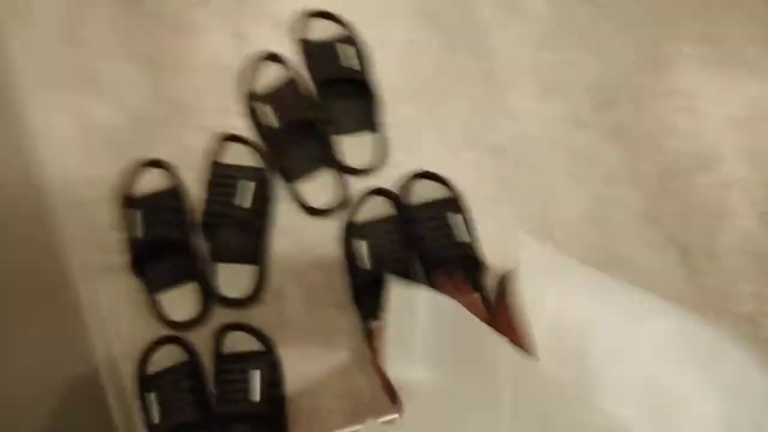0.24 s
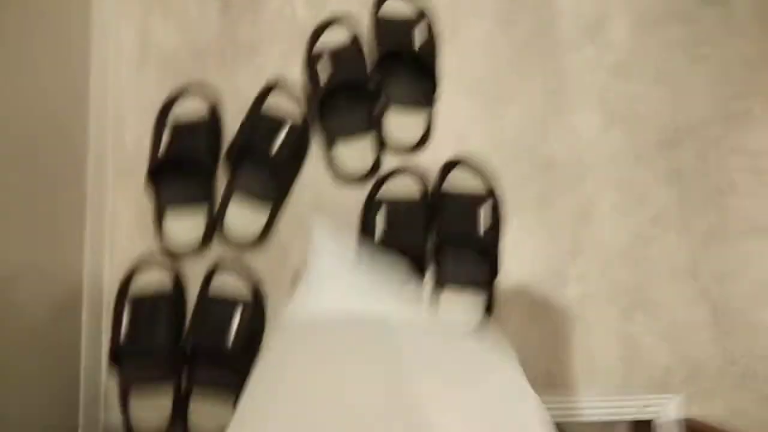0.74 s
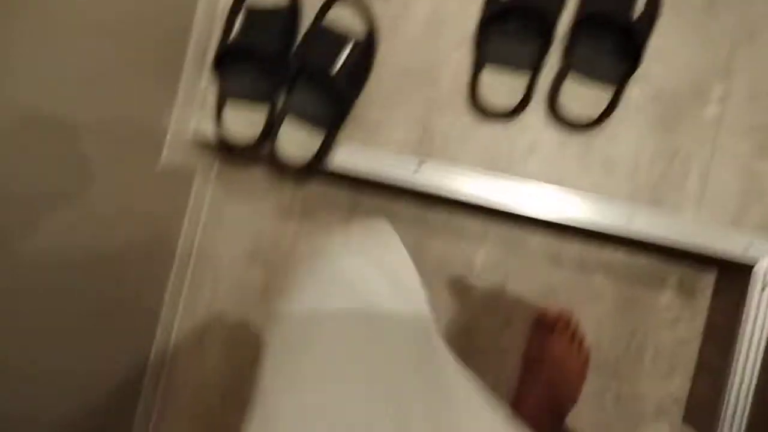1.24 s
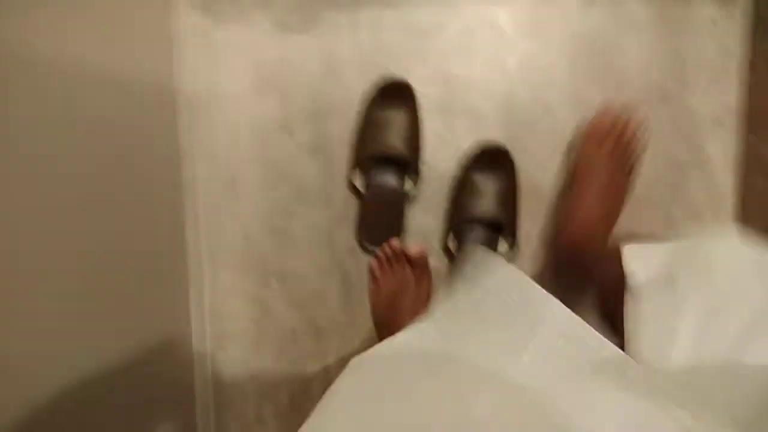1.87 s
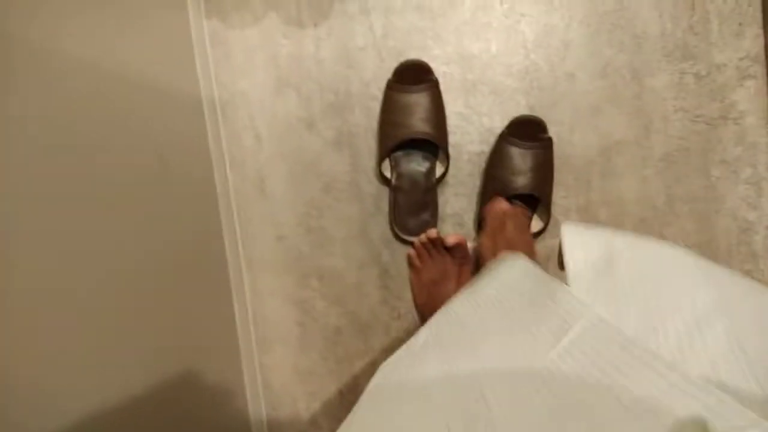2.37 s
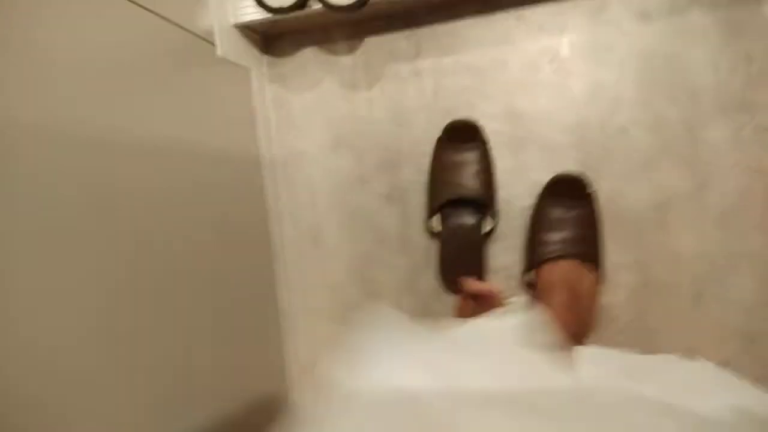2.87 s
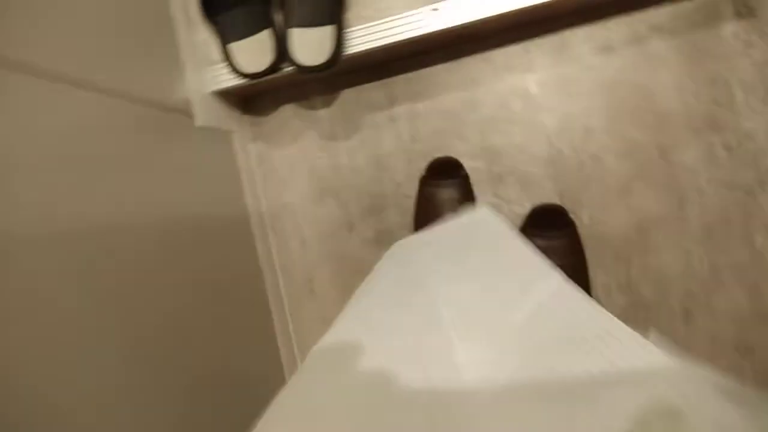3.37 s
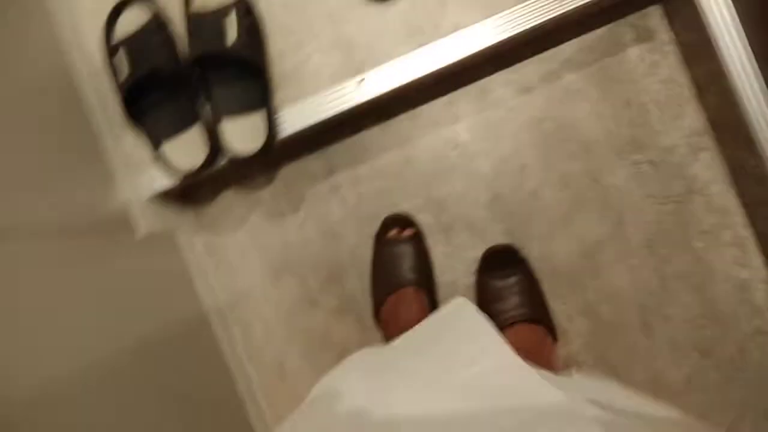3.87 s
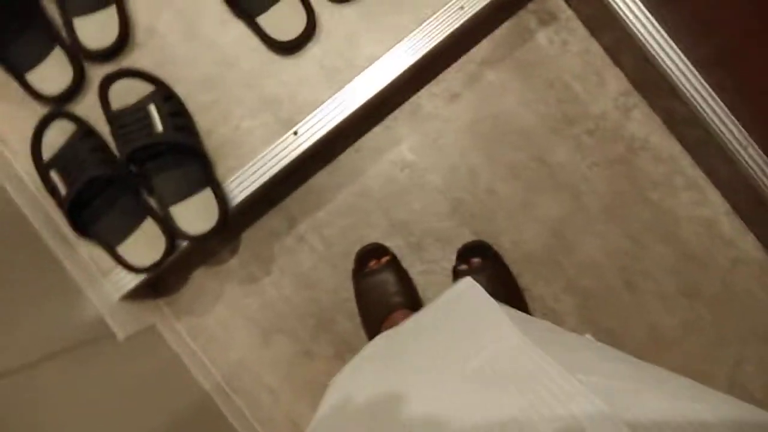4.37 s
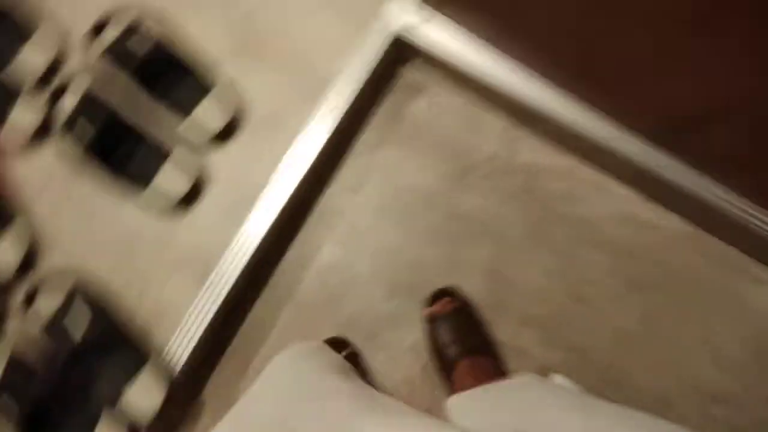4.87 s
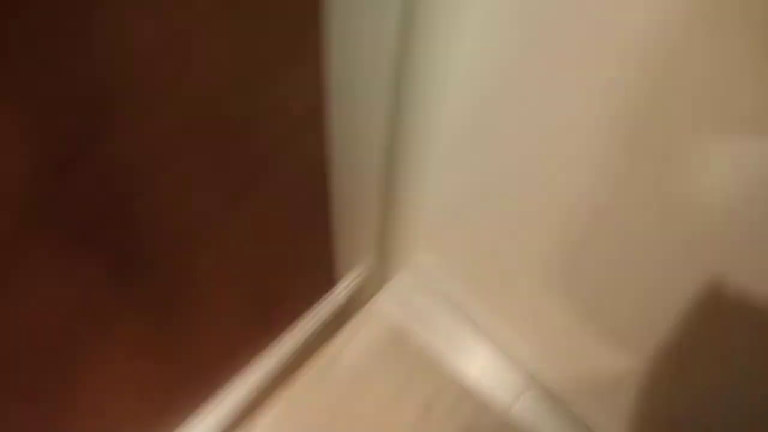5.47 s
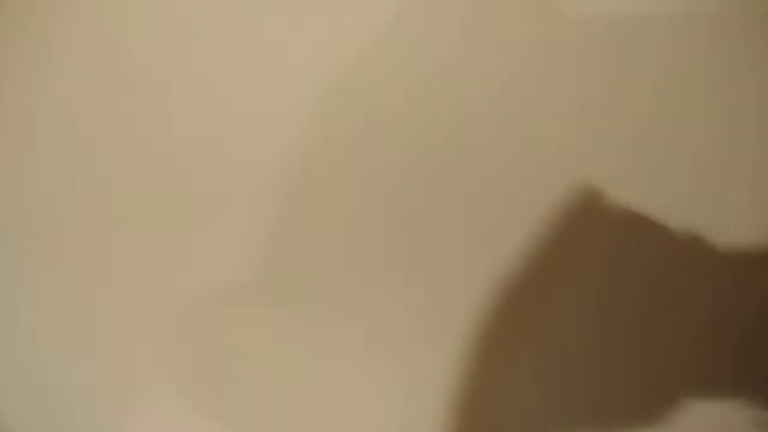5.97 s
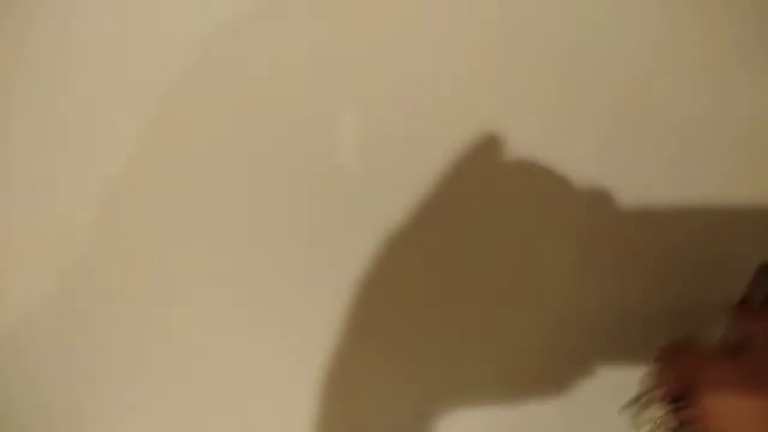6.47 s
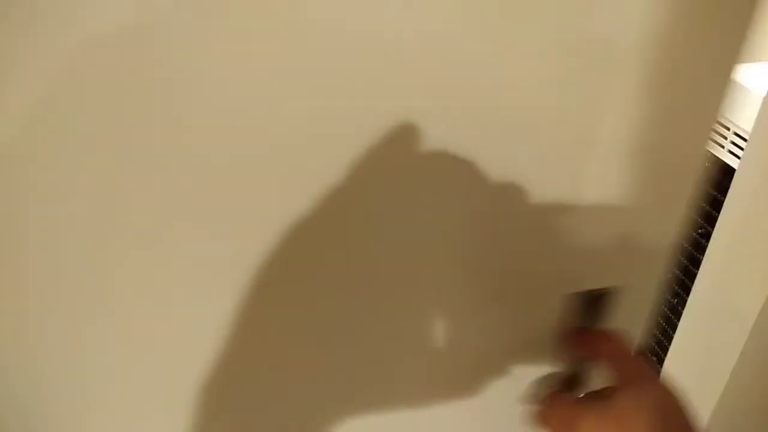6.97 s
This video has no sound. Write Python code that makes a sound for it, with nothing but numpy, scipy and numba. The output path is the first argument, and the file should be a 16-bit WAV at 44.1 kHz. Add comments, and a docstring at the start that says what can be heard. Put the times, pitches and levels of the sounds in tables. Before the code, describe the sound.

Bare feet and slippers scuff, slap and thud irregularly in a small hard-walled entrance hall, then a latch clicks and a door rumbles open.

```python
"""Footsteps and a sliding door in a small hall

Bare feet and slippers shuffle in a small hard-walled entrance hall, heard through a phone with two ports.
Soles scuff (coloured noise), rub (gliding resonances) and slap (short partials with a noisy crack);
heels thud and set the hall's damped modes booming. At the end a latch clicks and a door slides open,
its panel shaken by noise. The left port hears more treble, the right one more of the middle.
"""
import sys
import numpy as np
from scipy import signal
from scipy.fft import rfft, irfft, next_fast_len
from scipy.io import wavfile
from scipy.ndimage import uniform_filter1d
from numba import njit

SR = 44100
rng = np.random.default_rng(int(sys.argv[2]) if len(sys.argv) > 2 else 0)


def master(y):
    """Save y as 16-bit WAV."""
    cut = np.clip(np.atleast_2d(y).T, -1, 1)
    pcm = np.round(cut * 32767)  # scale
    wavfile.write(sys.argv[1], SR, pcm.astype(np.int16))


N = 318568

# Strokes of soles and hem over the floor and, near the end, of hand and door: (peak time [s],
# swell [s per 20 dB], fade [s per 20 dB], fine hiss [dB], dull hiss relative to fine [dB],
# coarse rasp [dB], rasp centre [Hz], weight on floor [dB]);
# each layer multiplies the swell and fade by its own linger, and a swell of 0 or less is abrupt
STROKES = [(0.02, 7.2, 0.3, -67, 1, -69, 1900, -94), (0.07, 0.002, 0.5, -54, 0, -64, 2120, -94),
           (0.096, 0.03, .16, -49, -4, -62, 850, -90), (0.266, 0.15, 0.22, -44.5, -7, -52.5, 970, -80),
           (0.442, -0.36, 0.22, -56, -5, -61.5, 1590, -45),
           (.605, 0.36, 0.7, -64.5, -8, -67.5, 1300, -61.5), (.78, 0.13, 0.64, -50.5, -7, -60.5, 1680, -49),
           (0.923, 0.1064, 0.1655, -38.5, -3.5, -46.5, 1770, -37),
           (.97, 0.1, 0.0563, -45, 2, -47, 1900, -55), (1.078, 0.27, 0.12, -54.5, 3, -51.5, 1090, -38),
           (1.28, 0.9, 0.62, -57, -2, -63, 2020, -89.5), (1.55, 0.05, 0.6, -60.5, -10, -66, 1150, -78),
           (1.661, 0.1, 0.22, -55.5, -0.5, -57.5, 1260, -60),
           (1.778, 0.03, 0.06, -41.5, -4, -52.5, 1800, -51), (1.852, 0.11, 0.17, -44, -3, -59, 1870, -43),
           (2.06, 2, 0.24, -68, -17, -64.5, 780, -73), (2.23, 0, 1.3, -80, -3, -65, 990, -80),
           (2.265, 0.06, 0.5, -64, -5, -70, 1100, -80), (2.284, 0, 0.02, -60, -5, -59, 1290, -62),
           (2.39, 0.08, 0.22, -59.5, -2, -57, 1290, -61), (2.438, 0.3, 0.17, -50.5, -11, -59.5, 1390, -57),
           (2.588, -0.18, 0.34, -57, 0, -56.5, 1590, -56), (2.669, 0.27, 0.35, -50.5, -5.5, -62, 1200, -51),
           (2.77, 0, 0.11, -56.5, 7, -53.5, 1210, -71), (2.861, -0.06, 0.39, -51.5, -1.5, -60, 1200, -57),
           (2.958, -0.09, 0.21, -52.5, 0.5, -60.5, 2210, -53),
           (3.07, -0.1, 0.36, -65.5, 2.5, -76, 1510, -57), (3.201, -0.07, 0.2, -70, 0, -64, 1000, -81),
           (3.247, 0.2, 0.1, -63.5, 0, -67, 1200, -71.5), (3.355, 0.08, 0.1, -67, 3, -66.5, 1800, -86),
           (3.401, 0.08, 0.2, -53.5, -4, -62, 1410, -86), (3.54, 0.13, 0.2, -58.5, 0.5, -59, 1280, -87.5),
           (3.634, -0.19, 0.3, -54.5, 2.5, -59.5, 1510, -67),
           (3.666, -0.08, 0.28, -50, -18.5, -58.5, 1390, -51.5),
           (3.861, 0.01, 0.06, -59, -8.5, -54, 1320, -40.5),
           (3.901, -0.03, 0.16, -43.5, -1.5, -54, 1200, -47),
           (3.951, 0.13, 0.29, -44, -1, -50, 1240, -45.5),
           (4.185, 0.1, 0.48, -49.5, -9, -54.5, 1200, -58.5), (4.268, -0.06, 0.2, -52, -24, -65, 1180, -82),
           (4.331, -0.57, 0.4, -59.5, 1.5, -57.5, 950, -49), (4.436, -0.5, 0.48, -54.5, -4, -59, 1080, -52),
           (4.602, 0.06, 0.14, -39, -7, -51, 960, -51), (4.768, 0.02, 0.31, -48.5, -7, -58.5, 1280, -59),
           (4.892, 0.07, 0.17, -56.5, 4.5, -60, 970, -55), (5.118, -0.45, 0.11, -54.5, -0.5, -58, 950, -43),
           (5.29, 0.53, 0.08, -72, 8, -63.5, 1200, -55.5), (5.35, 0.03, 0.12, -47.5, -6, -59, 1160, -88),
           (5.402, 0.09, 0.23, -41.5, -22, -58.5, 2600, -85),
           (5.575, 0.008, 0.2, -47.5, -7, -56, 1290, -78), (5.65, 0, .5, -56, -3, -60.5, 1190, -78),
           (5.83, 0.75, 0.57, -57, -5, -59, 1500, -74), (5.909, 0.004, 0.1, -40, -5, -52.5, 1400, -46.5),
           (5.979, -0.12, 0.22, -63, 3, -58.5, 1600, -37.5),
           (6.013, 0.0051, 0.115, -43.5, -3.5, -50, 1500, -34),
           (6.2, 1.5, 0.15, -57, -2.5, -66, 1810, -57.5), (6.3, 0.01, 0.5, -60, -2.5, -64, 1500, -70),
           (6.37, 0.28, 0.4, -55, -3, -60, 1650, -51.5), (6.474, 0.13, 0.31, -58.5, 0, -59, 1500, -42.5),
           (6.64, 0.14, 0.26, -53.5, -2.5, -59.5, 1050, -48.5), (6.939, 0, 0.04, -59, 1, -55, 1000, -60),
           (6.95, 0.01, 0.9, -62, -3, -62, 1000, -70), (7.088, 0.02, 0.06, -51, -8, -55, 870, -56.5),
           (7.155, 0.3, 0.25, -52.5, -6, -52, 870, -60)]
HISS_LINGER, DULL_LINGER, RASP_LINGER, WEIGHT_LINGER = 0.83, 0.89, 1.3, 0.77
# Colour of the fine hiss: (frequency [Hz], level per Hz [dB])
HISS = [(3500, -22), (5500, -10.5), (6800, -5.5), (8000, -2.5), (11700, -5), (15200, -7.5), (16000, -14)]
# Colour of the dull hiss: (frequency [Hz], level per Hz [dB])
DULL_HISS = [(1500, -10), (2500, -4.5), (3500, 0), (5000, -1), (6500, -4.5), (9000, -13)]
# Colour of the coarse rasp: (frequency [Hz], level per Hz [dB])
RASP = [(400, -8), (650, -3), (800, -1.5), (1100, -5), (1800, -5), (3000, -7.5), (5000, -7), (8000, -68)]
# Parts of the hiss that come and go on their own: (centre [Hz])
PATCHES = [3000, 4840, 7700, 10100, 14100]
PATCH_DB = 2  # spread of each part's wandering level
# the fainter the fine hiss, the more it leans to the left port
LEAN_BELOW_DB, LEAN_DB_PER_DB, LEAN_MOST_DB = -44, 0.1, 22
TICKS_PER_S, TICK_DB, TICK_S = 260, -11, 0.00068  # rate, least strength, decay constant
CRACKS_PER_S, CRACK_DB = 100, 28.5  # rate, least strength before filtering

# Narrow rubs of a sole: (start [s], end [s], level [dB], first pitch [Hz], last pitch [Hz], sharpness [Q])
RUBS = [(0.07, 0.115, -57, 1800, 1870, 9), (0.093, 0.21, -63, 850, 880, 5),
        (1.52, 1.69, -61, 850, 650, 2.5), (2.226, 2.28, -63, 950, 1150, 2.5),
        (2.24, 2.28, -67, 2250, 2000, 5), (2.74, 2.8, -55, 1700, 2300, 4), (3.67, 3.71, -56, 950, 950, 5),
        (5.12, 5.18, -52, 680, 680, 6)]
RUB_ONSET = 5  # a rub reaches full strength after one fifth of its length

# Sole slaps: (time [s], level [dB], ring [Hz], treble crack relative to hit [dB], left minus right [dB])
SLAPS = [(.096, -41, 1910, 3, -12), (.215, -31.5, 760, 2, -5), (.2165, -33, 2120, -10, -7),
         (.239, -35, 970, 6, 0), (.437, -40, 1880, -4, -12), (.5, -43, 1160, -21, -6),
         (.797, -20.5, 1630, -25, 3.5), (.838, -36.5, 720, -12, -3), (.897, -30, 1680, 2, 0),
         (.928, -26.5, 2070, -2, 8), (1.025, -20.5, 1660, -15, 5), (1.045, -32, 1060, -7, -13),
         (1.66, -60, 1100, -4, 2), (1.767, -35, 1740, -6, 0), (1.853, -33.5, 1920, -23, -5),
         (2.228, -66, 1050, -18, 6), (2.279, -38, 1050, -11, 9), (2.291, -39, 1600, -10, -2),
         (2.379, -39, 895, 2, 5), (2.384, -44, 1110, -9, -1), (2.5765, -36, 1490, -11, -7),
         (2.582, -39, 1450, -19, 4), (2.6015, -37, 1470, -20, -6), (2.624, -50, 1200, -13, -3),
         (2.632, -43, 1490, 6.5, -11), (2.689, -61, 1700, 0, 0), (2.729, -53, 1280, -10, 2),
         (2.758, -38, 1690, -14, -12), (2.769, -32, 840, -11, -3), (2.776, -41.5, 930, -19, -20),
         (2.783, -56, 910, -14, -6), (2.793, -53, 900, -14, -3), (2.806, -57, 750, -17, -1),
         (3.376, -50, 1310, 7, -10), (3.484, -40.5, 1090, -6, -10), (3.488, -41, 810, -12, -9),
         (3.5515, -37.5, 1620, -9, -7), (3.652, -38.5, 1410, 5, -15), (3.848, -36, 1600, -2, -6),
         (3.859, -36, 1560, -9, -10), (3.898, -31, 1180, 4, -6), (3.903, -35.5, 590, -12, 0),
         (3.931, -34, 3900, 4, 0), (3.9455, -28.5, 1150, 6, -7), (3.951, -34, 1050, -10, -9),
         (3.957, -30, 1210, -1, -2), (3.961, -32, 1230, -10, -7), (3.994, -40, 1730, -1, -2),
         (4.064, -27.5, 866, -11, -3), (4.0915, -26.5, 1060, -3, -10), (4.24, -39, 1400, -12, -8),
         (4.334, -35.5, 816, -16, -1), (4.344, -36, 1120, -10, -3), (4.46, -34.5, 1120, -20, -8),
         (4.48, -37.5, 860, -16, -7), (4.53, -57, 1980, 18, 5), (4.574, -39.5, 825, 4, -2),
         (4.612, -34, 870, -7, -6), (4.766, -39, 1060, 8, 4), (4.9095, -32, 940, -19, -5),
         (5.1095, -28, 970, -32, 1), (5.249, -45, 1240, -5, -13), (5.345, -43, 940, -14, 0),
         (5.578, -30.5, 1280, -4, -9), (5.672, -32.5, 1190, -8, -5), (5.845, -53, 2520, 13, 15),
         (5.909, -48, 1570, 21, 0), (5.948, -36.5, 1480, 12.5, 0), (6.009, -39, 1540, 10, 8),
         (6.017, -32, 1550, 2.5, 9)]
# Door hardware knocks: (time [s], level [dB], ring [Hz], treble crack relative to hit [dB],
# left minus right [dB])
KNOCKS = [(6.295, -50.5, 590, -20, -13), (6.415, -36.5, 1650, 13.5, -6), (6.42, -32, 1570, -14, -2),
          (6.427, -36, 1780, -10, -14), (6.463, -35, 2140, -12, -2), (6.794, -35, 365, -24, -4),
          (6.804, -38, 800, -25, -3), (6.812, -44, 402, -25, -2), (6.84, -54, 404, -13, 3),
          (6.939, -59, 593, -11, -4), (7.074, -38, 445, -25, 11), (7.161, -34, 745, -16, -6),
          (7.168, -41, 980, -14, 2), (7.185, -27, 705, -20, 0)]
SLAP_CYCLES, KNOCK_CYCLES = 12, 24  # cycles a hit rings until it is 60 dB down

# Low thuds of heels and, near the end, of the door: (time [s], level [dB],
# middle modes relative to low ones [dB], upper modes relative to low ones [dB])
THUDS = [(0.221, -37.5, -0.5, 2), (0.378, -41, -11, -14), (0.718, -50.5, -19, 1), (0.762, -43, -11, -15),
         (0.803, -32.5, -5, -8), (1.028, -47, 3, -6), (1.043, -30, -5.5, -9), (1.669, -42.5, -4, -13),
         (1.689, -33.5, -5, -16.5), (1.772, -32.5, -6, -10.5), (1.85, -39.5, 6, -4),
         (2.095, -48.5, -2.5, -9), (2.135, -44, -22, -21), (2.296, -31.5, -8, -13),
         (2.371, -36.5, -10.5, -29), (2.63, -33.5, -9, -19), (2.745, -41, -18, -30),
         (2.799, -38.5, -23, -33), (2.977, -41.5, -14, -20), (3.059, -50.5, 4, -1.5),
         (3.175, -47, -19, -25), (3.23, -46, -10, -34.5), (3.496, -38.5, -3.5, -12),
         (3.674, -43.5, -19, -32), (3.822, -45, -12, -17), (3.879, -39.5, -9, -5), (4.065, -29.5, 0, -11),
         (4.091, -35.5, -1, -21), (4.337, -36.5, -1.5, -14), (4.465, -43, 0, -24), (4.575, -43, 8, -20),
         (4.912, -38, -1, -28), (5.111, -32, 3, -9.5), (5.344, -45, -9, -45), (5.672, -27, -10, -14),
         (5.759, -34.5, -14, -15), (5.95, -27.5, -26, -14.5), (6.302, -58, -3, -8),
         (6.415, -31.5, -27, -3.5), (6.434, -28, -19, -18), (6.584, -40, 5.5, -5), (6.793, -45, 4, 4),
         (6.945, -42, 6.5, -14), (7.068, -27.5, -1.5, -15), (7.101, -35.5, -3, -4.5),
         (7.158, -32.5, 0, 1.5)]
# Low resonances of the hall: (frequency [Hz], level [dB], t60 [s])
HALL_MODES = [(67.5, -9, 0.11), (100, -8.5, 0.082), (172, 1, 0.09), (153, -10, 0.2), (177, 3, 0.3),
              (200, -5, 0.18)]
# Middle resonances of the hall: (frequency [Hz], level [dB], t60 [s])
MIDDLE_MODES = [(225, -3, 0.07), (240, -6, 0.14), (250.5, 2.5, 0.28), (274.4, -4, 0.15)]
# Upper resonances of the hall: (frequency [Hz], level [dB], t60 [s])
UPPER_MODES = [(336, -3.5, 0.28), (390, -4, 0.31), (446.3, -3.5, 0.38), (554.7, 9.5, 0.022),
               (645, -8, 0.31)]
CONTACT_S = 0.0148  # how long each thud presses on the floor

# Door panel rumbling on its track: (time [s], level [dB], extra on modes above 450 Hz [dB])
DOOR = [(6.25, -55, -45), (6.316, -42.5, -21), (6.34, -71, -18), (6.452, -36, -6), (6.508, -41.5, -11),
        (6.552, -51.5, -4), (6.614, -40, -11.5), (6.736, -57.5, 1.5), (6.787, -43.5, -8),
        (6.794, -39.5, -7.5), (6.882, -41.5, -3), (6.922, -42.5, -4.5), (7.098, -35, -7.5), (7.14, -42, -3),
        (7.168, -40.5, 9), (7.202, -34, -3), (7.22, -37, 4)]
# Resonances of the door panel: (frequency [Hz], width [Hz], level [dB])
DOOR_MODES = [(155, 34, -20), (237, 19, 0.5), (278, 33, -5), (366, 46, -6.5), (545, 110, -7),
              (760, 230, -2), (970, 18, -6), (1280, 740, -6.5)]
# Groan of the rolling door, sinking in pitch with a late upturn: (time [s], pitch [Hz], level [dB])
GROAN = [(6.78, 370, -90), (6.795, 360, -45.5), (6.85, 340, -42), (6.865, 300, -56), (6.9, 280, -42.5),
         (6.92, 246, -35), (7.0, 250, -39.5), (7.04, 212, -36), (7.08, 221, -35), (7.13, 185, -43),
         (7.17, 210, -33), (7.22, 230, -32.5)]
GROAN_SHARPNESS, GROAN_EVENNESS = 5, .6  # Q; 0 leaves the groan uneven, 1 levels it fully

# Scrape of the turning handle: (start [s], end [s], level [dB], frequency [Hz], width [Hz])
HANDLE = (6.37, 6.432, -46, 1570, 130)
# Steel ping of the latch: (time [s], level [dB], ring [Hz], t60 [s])
LATCH = (6.4153, -19.5, 12700, .005)
SNAP_DB, SNAP_S = -26.5, 0.0057  # broad crack of the bolt: strength before filtering, decay constant

# Colour of the still air: (frequency [Hz], level per Hz [dB])
AIR = [(24, -60), (40, -6), (176, 4), (262, -4), (382, -17.5), (965, -14.5), (2500, -36), (4460, -5),
       (5870, -53), (12100, -7.5), (16000, -24)]
AIR_DB = -65
# Decay of the hall's diffuse tail: (frequency [Hz], t60 [s])
TAIL_T60 = [(200, 1), (1000, 0.31), (4000, 0.04), (12000, 0.068)]
TAIL_DB = -4
# How alike noise is at the two ports: (frequency [Hz], correlation [0 to 1])
PORT_LIKENESS = [(60, 0.98), (200, 0.85), (400, 0.5), (700, 0.61), (1200, 0.0062), (16000, 0.02)]
# Colour difference between the ports: (frequency [Hz], left minus right [dB])
PORT_BALANCE = [(60, -3), (200, 0), (400, 0), (700, 0.5), (1300, -0.5), (2400, -6), (4400, -2), (7000, -2),
                (9500, 3.5), (11000, 11.5), (15500, 10)]
# Bands of the phone's noise suppressor: (band top [Hz], level below which the band is turned down [dB])
GATES = [(320, -59), (750, -59.5), (1500, -62), (3000, -63), (5000, -63.5), (9500, -65), (17000, -58.5)]
GATE_SLOPE, GATE_DEPTH_DB, GATE_RELEASE_S = 2.08, -12, 0.05  # slope in dB per dB
TOP_HZ = 15900


def undb(db):
    """Decibels to gain."""
    return 10 ** (np.asarray(db) / 20)


def level(x, db):
    """Scale to an rms level."""
    return x * undb(db) / np.sqrt(np.mean(x ** 2))


def curves(table):
    """Columns joined by straight lines in time."""
    s, *columns = np.transpose(table)
    return [np.interp(np.arange(N) / SR, s, c) for c in columns]


def along_hz(table, size):
    """A (frequency, value) table read at every bin of a transform."""
    hz, value = np.transpose(table)
    bins_hz = np.arange(size // 2 + 1) * SR / size
    return np.interp(np.log(bins_hz + 1), np.log(hz), value)


def pair_noise(count, colour):
    """Coloured noise of unit rms at two ports, alike in the bass and nearly unrelated in the treble."""
    size = next_fast_len(count)
    alike = np.clip(along_hz(PORT_LIKENESS, size), 0, 1)
    mid, side = rfft(rng.standard_normal((2, size)))
    pair = mid * np.sqrt(1 + alike) + side * np.sqrt(1 - alike) * np.array([[1], [-1]])
    return level(irfft(pair * undb(along_hz(colour, size)), size)[:, :count], 0)


def flicker(rate, depth_db):
    """Gain that wanders: a new random level every 1 / rate s, with straight glides between in dB."""
    hold = int(SR / rate)
    steps = np.repeat(rng.standard_normal(N // hold + 1), hold)
    return undb(depth_db * uniform_filter1d(steps, hold)[:N])


def mode(x, hz, t60):
    """One damped resonance; a unit impulse rings with a starting envelope of 1."""
    pole = np.exp(2j * np.pi * hz / SR - np.log(1000) / (t60 * SR))
    return signal.lfilter([1], [1, -pole], x).imag


def width_t60(width_hz):
    """Ring time of a resonance from its bandwidth."""
    return np.log(1000) / np.pi / width_hz


@njit
def svf(x, hz, sharpness):
    """State-variable band-pass whose centre may move every sample."""
    y = np.empty(len(x))
    band_state, low_state, damping = 0., 0., 1 / sharpness
    for i in range(len(x)):
        g = np.tan(np.pi * hz[i] / SR)
        band = (band_state + g * (x[i] - low_state)) / (1 + g * (g + damping))
        band_state = 2 * band - band_state
        low_state += 2 * g * band
        y[i] = damping * band
    return y


def svf_twice(x, hz, sharpness):
    """Two equal band-passes in a row, for steeper skirts."""
    return svf(svf(x, hz, sharpness), hz, sharpness)


def add(track, s, sound):
    """Mix a sound in at time s."""
    i = int(s * SR)
    track[..., i:i + sound.shape[-1]] += sound[..., :N - i]


def still_air():
    """Steady background of the still air: coloured noise at a fixed level."""
    return level(pair_noise(N, AIR), AIR_DB)


def strokes():
    """Each stroke swells to its peak and fades; overlapping strokes add in power and blend their colours."""
    columns = np.transpose(STROKES)[:, :, None]
    s, swell_s, fade_s, hiss_db, dull_db, rasp_db, rasp_hz, weight_db = columns
    t = np.arange(0, N + 64, 64) / SR  # every 64 samples is fine enough for envelopes
    swelling = (s - t) / np.maximum(swell_s, .002)
    fading = (t - s) / np.maximum(fade_s, .02)
    below_db = 20 * np.where(t < s, swelling, fading)

    def power(db, linger):
        return undb(db - below_db / linger) ** 2 + 1e-30

    rasp = power(rasp_db, RASP_LINGER)
    powers = (power(hiss_db, HISS_LINGER), power(hiss_db + dull_db, DULL_LINGER),
              rasp, power(weight_db, WEIGHT_LINGER))
    gains = [np.sqrt(p.sum(axis=0)) for p in powers]
    centre_hz = (rasp * rasp_hz).sum(axis=0) / rasp.sum(axis=0)
    return [np.interp(np.arange(N) / SR, t, c) for c in (*gains, centre_hz)]


def patchy(x):
    """Each part of the spectrum swells and sinks on its own, so the colour keeps shifting."""
    size = next_fast_len(N)
    whole = rfft(x, size)
    out = 0
    for centre in PATCHES:
        share = along_hz([(hz, 1. * (hz == centre)) for hz in PATCHES], size)
        out = out + irfft(whole * share, size)[:, :N] * flicker(30, PATCH_DB)
    return out


def scuff(fine, dull, coarse, rasp_hz):
    """Dense micro-slips of the strokes: a hiss and a coarser rasp whose colour moves with the stroke."""
    fine_db = 20 * np.log10(fine)
    lean_db = np.clip(LEAN_DB_PER_DB * (LEAN_BELOW_DB - fine_db), 0, LEAN_MOST_DB)
    # fibres catch and let go: short bursts in the fine hiss
    catch = rng.random((2, N))
    ticks = (catch[0] < TICKS_PER_S / SR) * undb(TICK_DB - 2.0 * np.log(1 - .9 * catch[1]))
    crackle = 1 + signal.lfilter([1], [1, -np.exp(-1 / (TICK_S * SR))], ticks)
    fine_hiss = fine * crackle * patchy(pair_noise(N, HISS)) * undb(lean_db * np.array([[0.3], [-0.7]]))
    dull_hiss = dull * pair_noise(N, DULL_HISS) * flicker(60, 1.77)
    hiss = (fine_hiss + dull_hiss) * flicker(25, 0.9) * flicker(90, 0.36) * flicker(600, 0.12)
    grit = pair_noise(N, RASP) * flicker(45, 2.02) * flicker(300, 1.38)
    rasp = .5 * grit + 1.486 * np.array([svf(port, rasp_hz, 0.7) for port in grit])
    # now and then a grain of grit cracks
    chance = rng.random((2, N))
    cracks = (chance[0] < CRACKS_PER_S / SR) * undb(CRACK_DB - 1.9 * np.log(1 - .95 * chance[1]))
    cracks = svf_twice(cracks, 1.8 * rasp_hz, 0.95)
    return hiss + (rasp + cracks * np.array([[0.6], [-1]])) * coarse


def rubs():
    """Rubber drags on the floor: noise in one gliding resonance."""
    out = np.zeros((2, N))
    for start, end, db, first_hz, last_hz, sharpness in RUBS:
        size = int((end - start) * SR)
        hz = np.linspace(first_hz, last_hz, size)
        rub = svf_twice(rng.standard_normal(size), hz, 1. * sharpness)
        onset = np.clip(np.linspace(0, RUB_ONSET, size), .3, 1)
        release = np.clip(np.linspace(5, 0, size), 0, 1)
        add(out, start, level(rub, db) * release * onset)
    return out


def hits(table, cycles, crack_s):
    """Each hit: a dull ring of three partials, a burst of trapped air around it and a treble crack."""
    out = np.zeros((2, N))
    t = np.arange(int(.06 * SR)) / SR
    luck = rng.standard_normal((len(table), 4, len(t)))
    treble = signal.butter(2, 2500, "high", fs=SR, output="sos")
    partials = ((.72, 0.15), (1, 0.86), (1.45, 0.071))  # (ratio to the ring, share)
    for (s, db, hz, crack_db, pan_db), noise in zip(table, luck):
        fade = undb(-60 * t * hz / cycles) * np.minimum(t / 0.00065, 1)  # lands within a millisecond
        ring = sum(share * np.sin(2 * np.pi * ratio * hz * t) for ratio, share in partials)
        around = signal.butter(3, [hz * .6, hz * 1.6], "band", fs=SR, output="sos")
        puff = signal.sosfilt(around, noise[:2] * fade)
        crack = signal.sosfilt(treble, noise[2:] * np.exp(-t / crack_s))
        sound = 1.08 * ring * fade + 2.86 * puff + 0.52 * undb(crack_db) * crack
        add(out, s, sound * undb(db + np.array([[pan_db], [-pan_db]]) / 2))
    return out


def booms(weight):
    """The floor flexes under each blow; blows and noisy drag under the strokes' weight ring the hall's modes."""
    out = np.zeros((2, N))
    phase_of_step = np.linspace(0, 1, int(CONTACT_S * SR))
    push = np.sin(np.pi * phase_of_step ** 0.5) ** 2  # lands fast, lets go slowly
    push_t = np.arange(len(push)) / SR
    # (modes, drag [dB], skew between the ports [dB])
    groups = ((HALL_MODES, -34, 1.0), (MIDDLE_MODES, -37, 1.5), (UPPER_MODES, -48, 3.0))
    for group, (modes, drag_db, skew_db) in enumerate(groups):
        for k, (hz, db, t60) in enumerate(modes):
            blows = np.zeros(N)
            # each thud reaches each mode with a random strength and phase
            luck = rng.standard_normal((len(THUDS), 2))
            for (s, peak_db, *share_db), (size, phase) in zip(THUDS, luck):
                flex = np.cos(2 * np.pi * hz * push_t + 0.68 * phase)
                blow_db = peak_db + [0, *share_db][group] + 1.8 * size
                add(blows, s - 0.1916 * CONTACT_S, 2 * flex * push / push.sum() * undb(blow_db))
            drag = rng.standard_normal(N) * weight * undb(drag_db)
            side = undb(skew_db * (-1) ** k * np.array([[1], [-1]]))  # neighbours lean opposite ways
            out += side * mode(undb(db - 8.5) * blows + undb(db) * drag, hz, t60)
    return out


def door_panel():
    """Rollers shake the panel in uneven jolts and it answers with its own resonances."""
    low_db, rattle_db = curves(DOOR)
    moving = np.clip((np.arange(N) / SR - DOOR[0][0]) / 0.04, 0, 1)
    out = np.zeros((2, N))
    jolts = pair_noise(N, [(20, 0), (20000, 0)]) * flicker(70, 1.0)
    for hz, width_hz, db in DOOR_MODES:
        shake = jolts * moving * undb(low_db + rattle_db * (hz > 450))
        out += undb(db - 42.0) * np.sqrt(width_hz) * mode(shake, hz, width_t60(width_hz))
    return out


def door_groan():
    """The rolling door groans: uneven noise in a sharp moving resonance, its swells partly levelled."""
    groan_hz, groan_db = curves(GROAN)
    roll = rng.standard_normal(N) * flicker(60, 1.4)
    groan = svf_twice(roll, groan_hz, GROAN_SHARPNESS)
    loudness = uniform_filter1d(np.abs(groan) + 1e-9, SR // 100)
    return level(groan / loudness ** GROAN_EVENNESS, 0) * undb(groan_db)


def latch():
    """The handle scrapes as it turns, then the bolt lets go with a broad snap and a tiny steel ping."""
    out = np.zeros((2, N))
    start, end, db, hz, width_hz = HANDLE
    size = int((end - start) * SR)
    scrape = level(mode(rng.standard_normal(size), hz, width_t60(width_hz)), db)
    add(out, start, scrape * np.linspace(.3, 1, size))
    s, db, hz, t60 = LATCH
    t = np.arange(int(.03 * SR)) / SR
    envelope = undb(db - 60 * np.maximum(t - .0015, 0) / t60) * np.minimum(t / .0015, 1)
    ping = np.sin(2 * np.pi * hz * t) * envelope
    snap = svf(rng.standard_normal(len(t)), np.full(len(t), 3500.), 1.0)
    snap = snap * undb(SNAP_DB) * np.exp(-t / SNAP_S)
    add(out, s, (ping + snap) * np.array([[1], [.5]]))
    return out


def hall(dry):
    """Diffuse tail: octave bands of noise that die away at their own rates."""
    size = SR // 2
    t = np.arange(size) / SR
    tail_hz, tail_s = np.transpose(TAIL_T60)
    tail = 0
    for hz in 250 * 2 ** np.arange(7):
        t60 = np.interp(np.log(hz), np.log(tail_hz), tail_s)
        octave = [(hz / 2, -40), (hz / np.sqrt(2), 0), (hz * np.sqrt(2), 0), (hz * 2, -40)]
        tail = tail + pair_noise(size, octave) * np.sqrt(hz / t60) * undb(-60 * t / t60)
    tail = tail * np.clip((t - .003) / 0.0027, 0, 1)  # the tail follows the direct sound
    tail = tail / np.sqrt(np.sum(tail ** 2) / 2)
    return dry + undb(TAIL_DB) * signal.fftconvolve(dry.mean(axis=0)[None], tail, axes=1)[:, :N]


def scene():
    """Feet and door in the hall, over still air."""
    fine, dull, coarse, weight, rasp_hz = strokes()
    floor = scuff(fine, dull, coarse, rasp_hz) + rubs() + booms(weight)
    bolt = latch()
    # the latch is next to the phone, so the hall adds little to it
    knocked = hits(SLAPS, SLAP_CYCLES, .002) + hits(KNOCKS, KNOCK_CYCLES, .0015)
    struck = hall(knocked + .25 * bolt) + .75 * bolt
    return still_air() + floor + struck + door_panel() + door_groan()


def suppress(x):
    """Port by port and band by band, a quiet band is turned down; it opens at once and closes slowly."""
    size = 512
    hz, _, frames = signal.stft(x, SR, nperseg=size, noverlap=size * 3 // 4)
    tops_hz, open_db = np.transpose(GATES)
    band = np.minimum(np.searchsorted(tops_hz, hz), len(GATES) - 1)
    bins_power = np.abs(frames) ** 2
    power = np.stack([np.sum(bins_power[:, band == k], axis=1) for k in range(len(GATES))], axis=1)
    keep = np.exp(-size / 4 / SR / GATE_RELEASE_S)
    for i in range(1, power.shape[2]):
        power[..., i] = np.maximum(power[..., i], keep * power[..., i - 1])
    over_db = 10 * np.log10(power + 1e-18) - open_db[:, None]
    gain_db = np.clip(GATE_SLOPE * over_db, GATE_DEPTH_DB, 0)
    return signal.istft(frames * undb(gain_db[:, band]), SR, nperseg=size, noverlap=size * 3 // 4)[1][:, :N]


def record(dry):
    """Each port has its own colour; the bass is rolled off, quiet bands are suppressed and the top is cut."""
    size = next_fast_len(N + SR // 10)
    tilt_db = along_hz(PORT_BALANCE, size) * np.array([[.5], [-.5]])
    ports = irfft(rfft(dry, size) * undb(tilt_db), size)[:, :N]
    bass_cut = signal.butter(2, 120, "high", fs=SR, output="sos")
    top_cut = signal.ellip(12, .2, 80, TOP_HZ, fs=SR, output="sos")
    return signal.sosfilt(top_cut, suppress(signal.sosfilt(bass_cut, ports)))


dry = scene()
out = record(dry)
master(out)
```